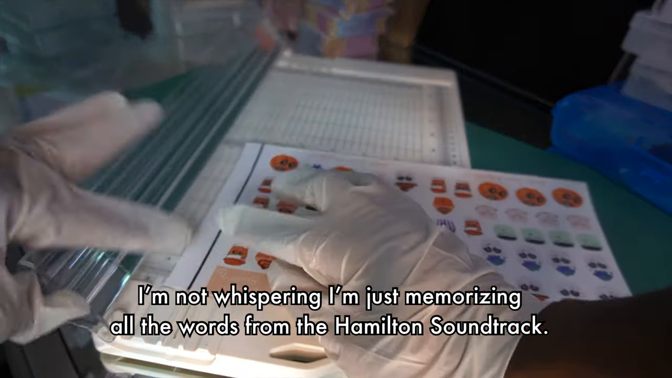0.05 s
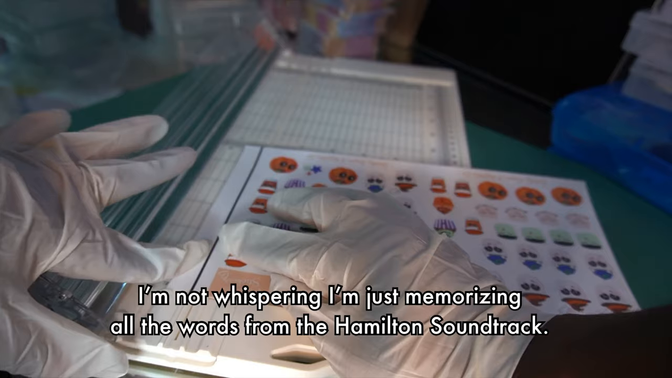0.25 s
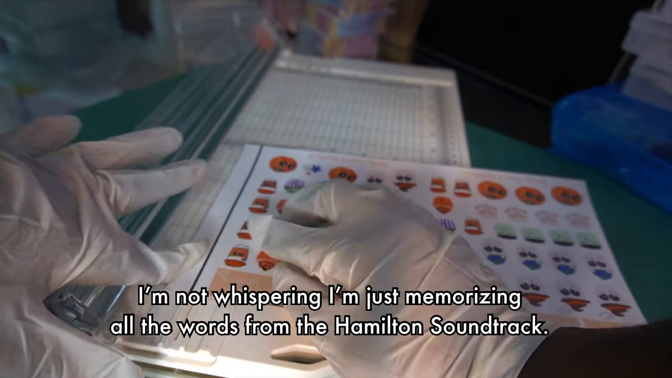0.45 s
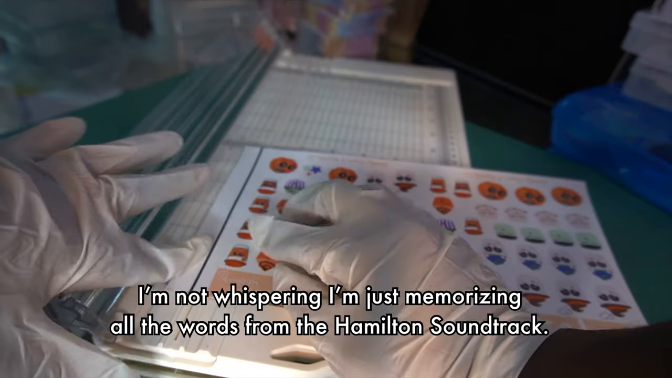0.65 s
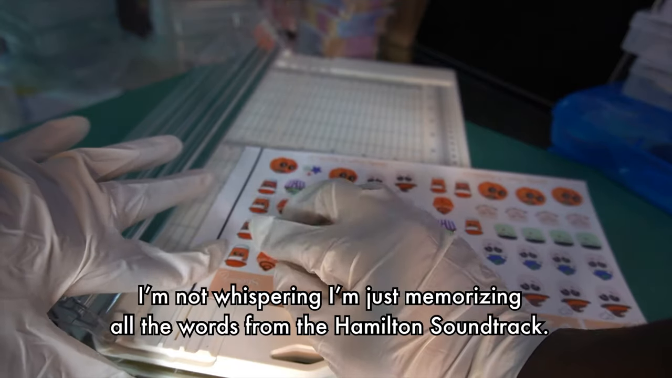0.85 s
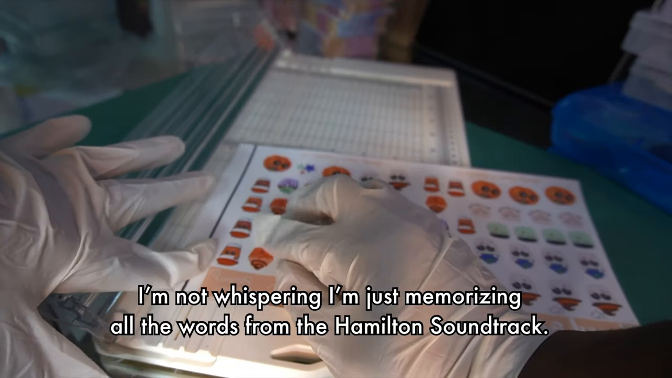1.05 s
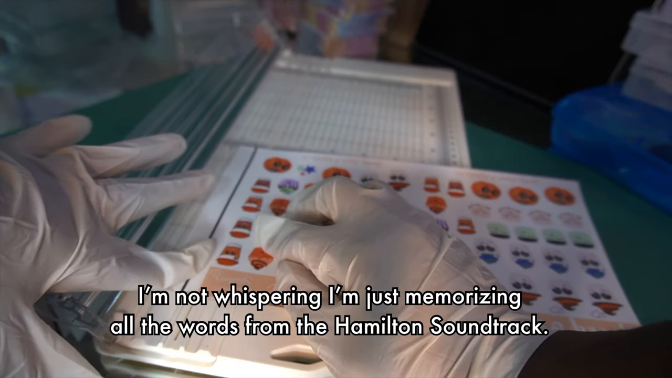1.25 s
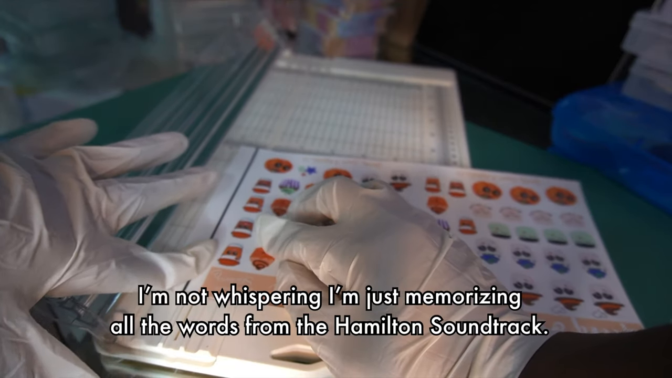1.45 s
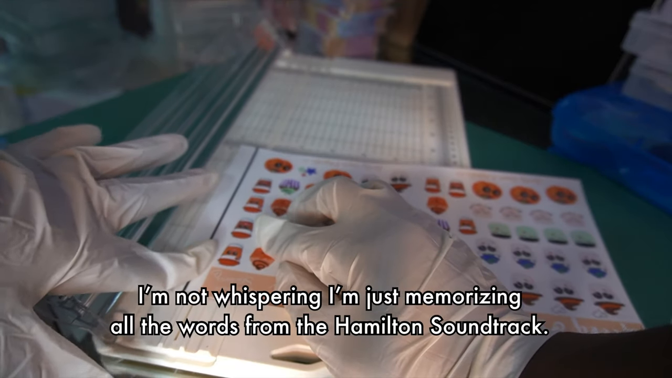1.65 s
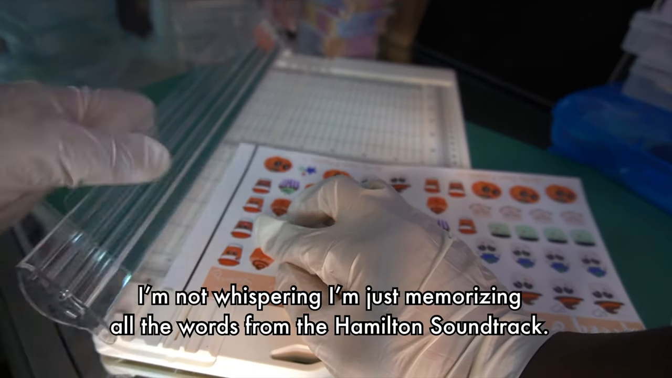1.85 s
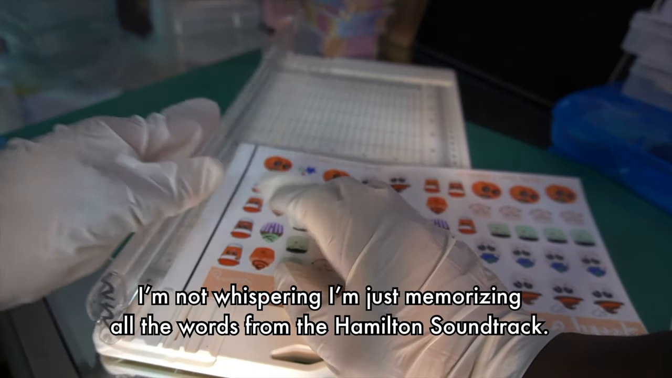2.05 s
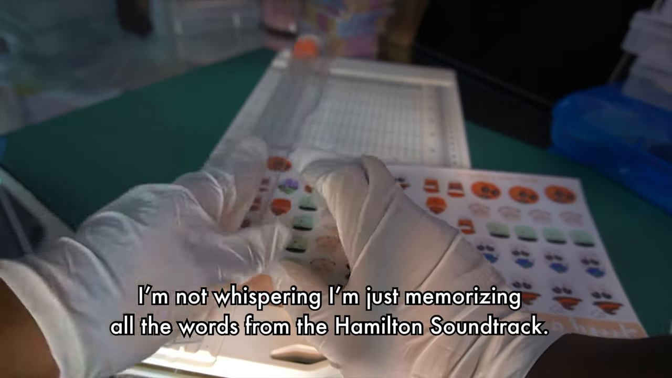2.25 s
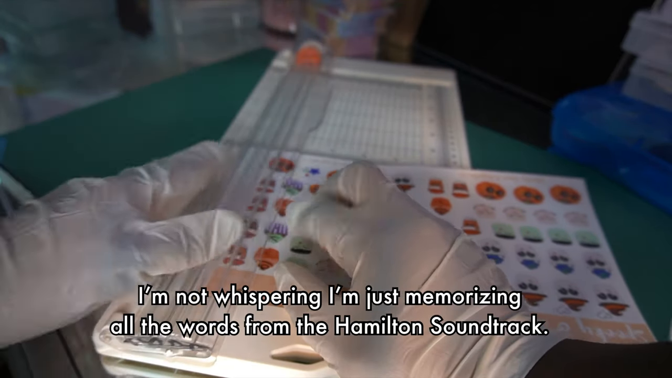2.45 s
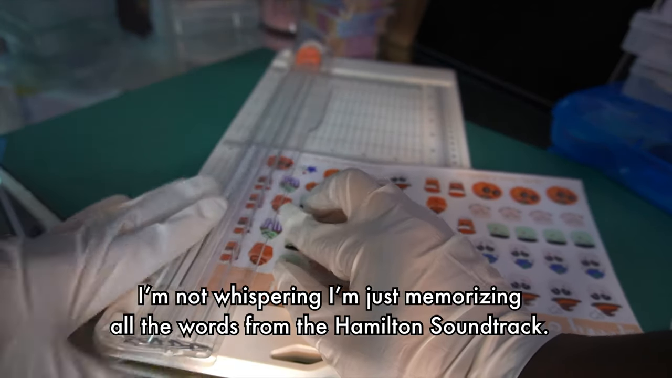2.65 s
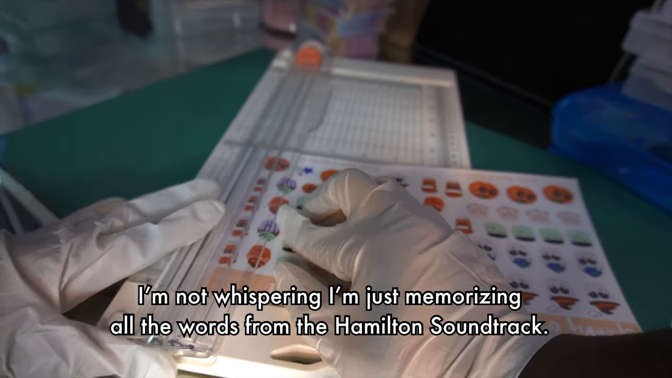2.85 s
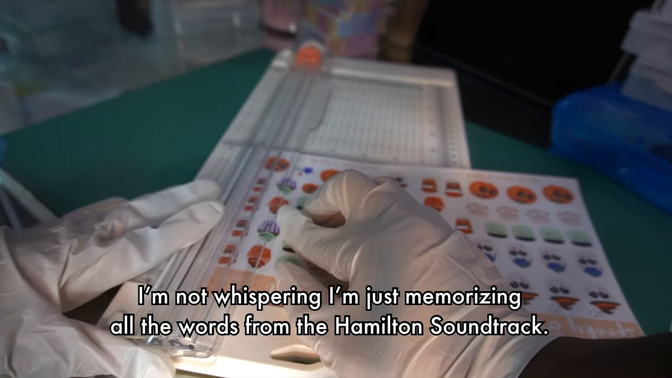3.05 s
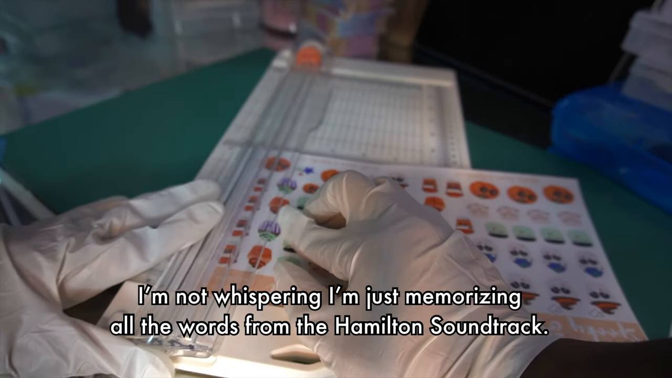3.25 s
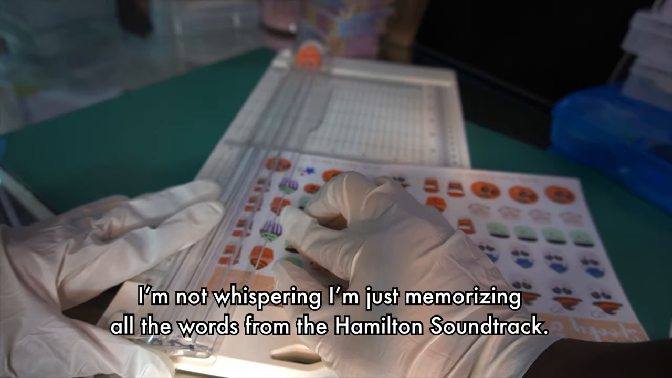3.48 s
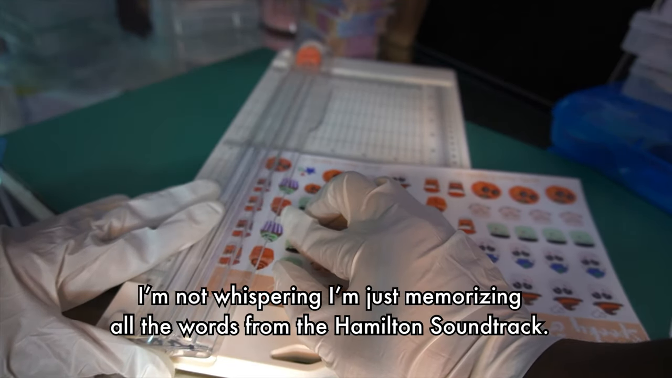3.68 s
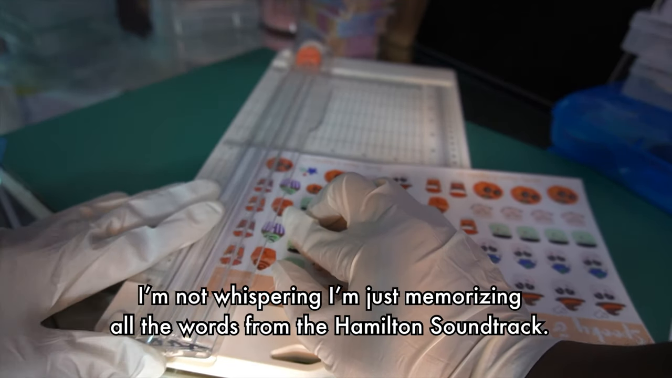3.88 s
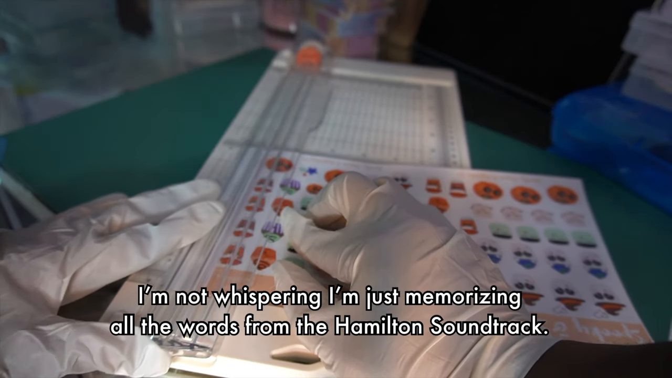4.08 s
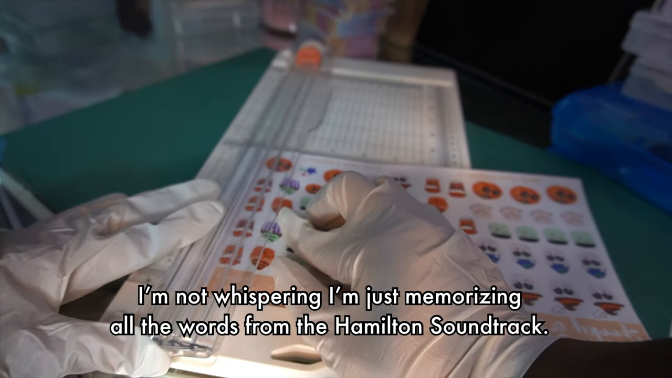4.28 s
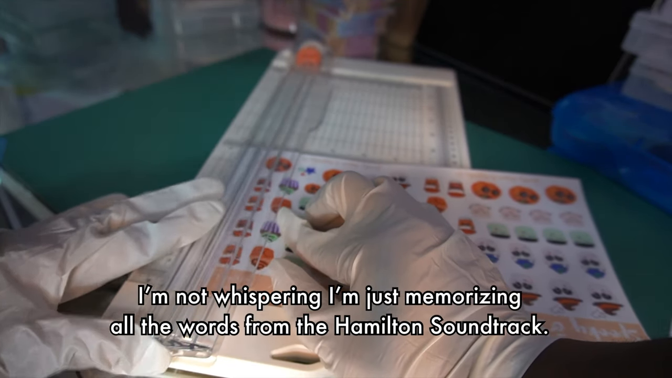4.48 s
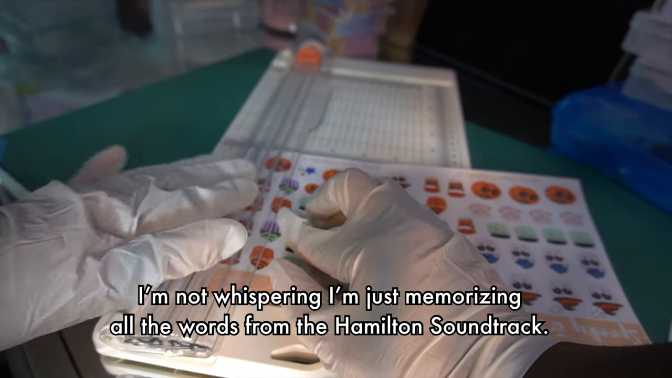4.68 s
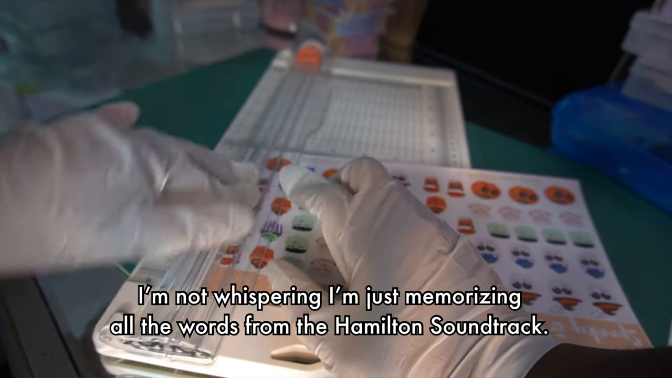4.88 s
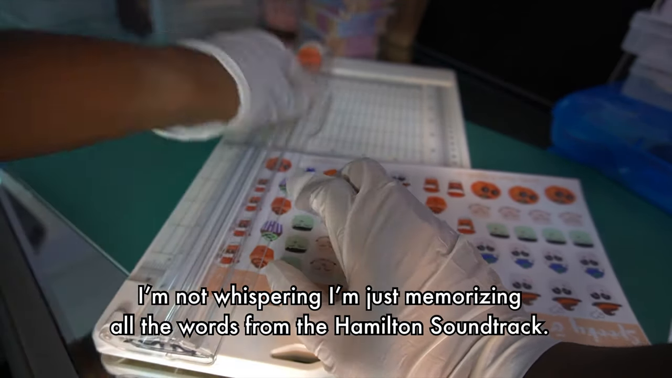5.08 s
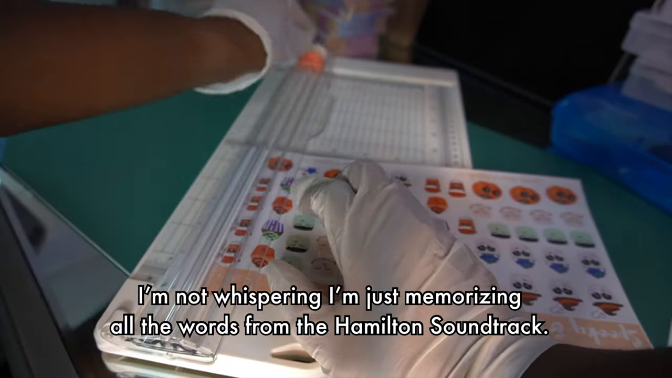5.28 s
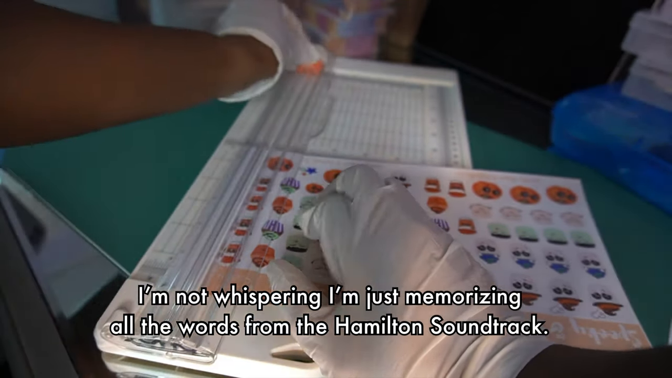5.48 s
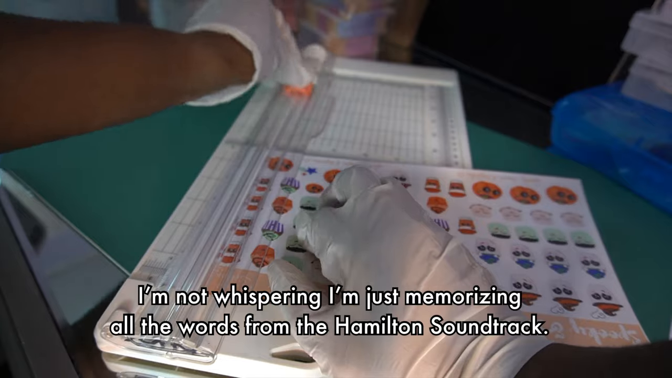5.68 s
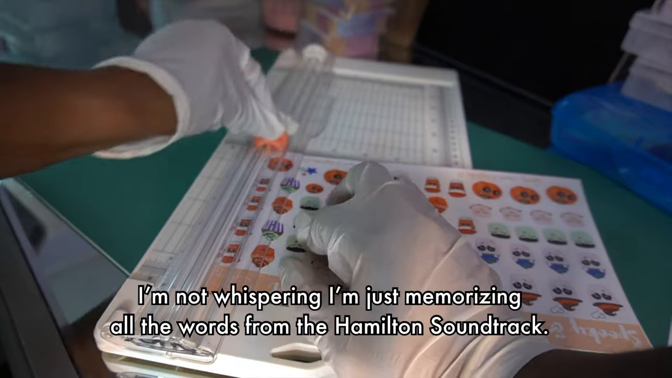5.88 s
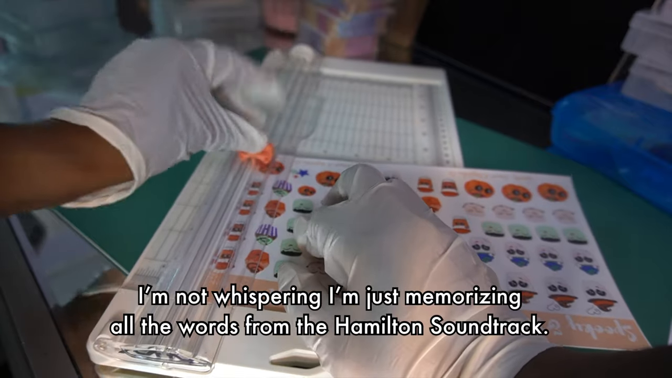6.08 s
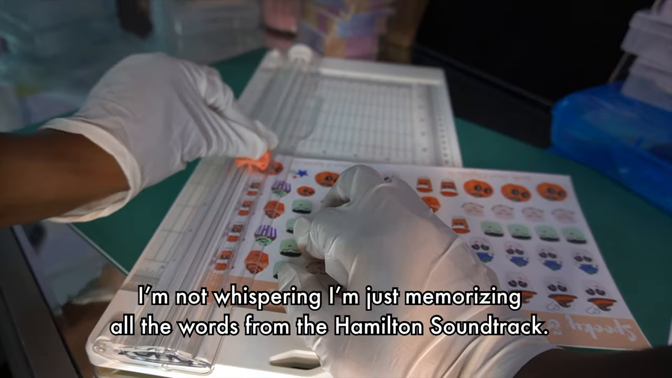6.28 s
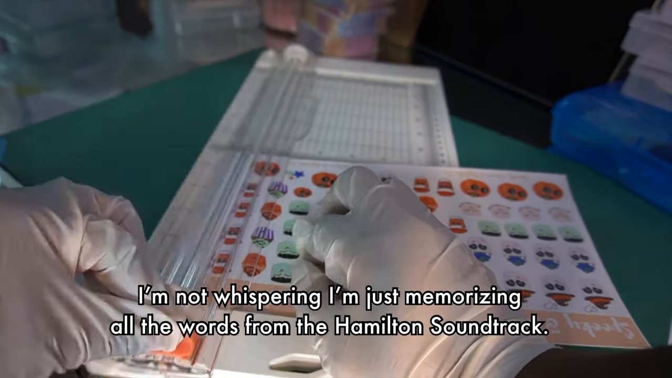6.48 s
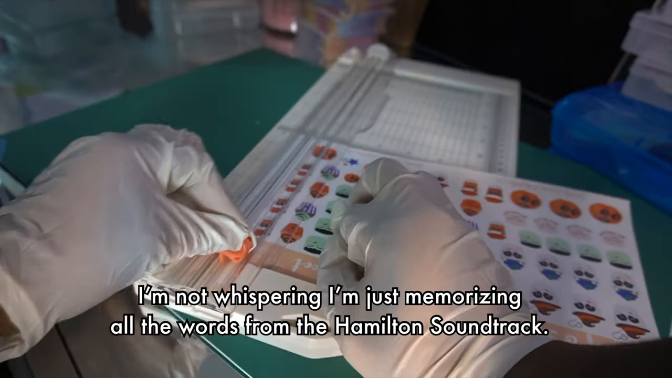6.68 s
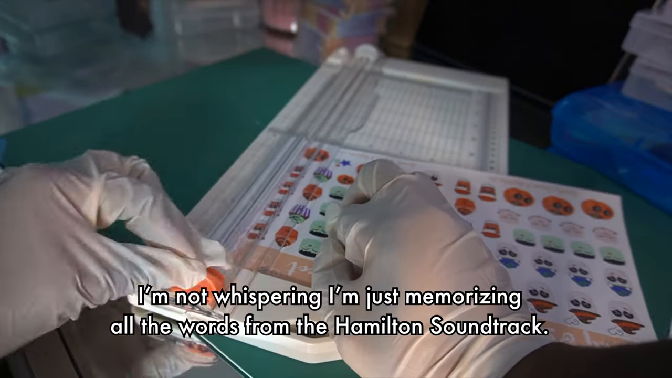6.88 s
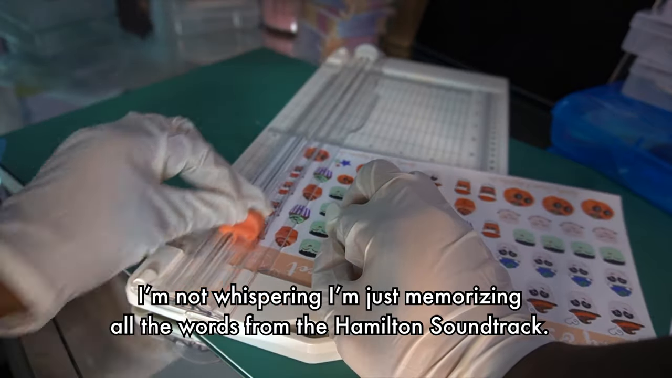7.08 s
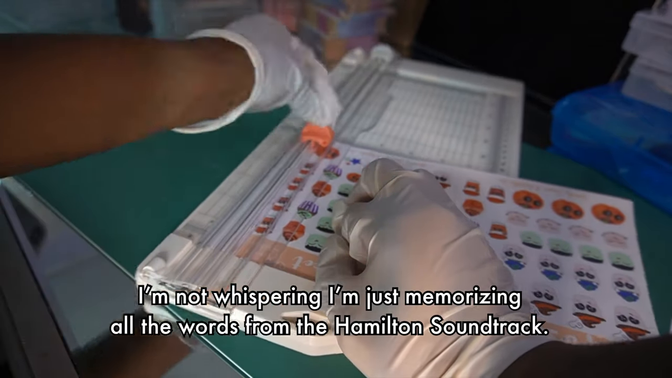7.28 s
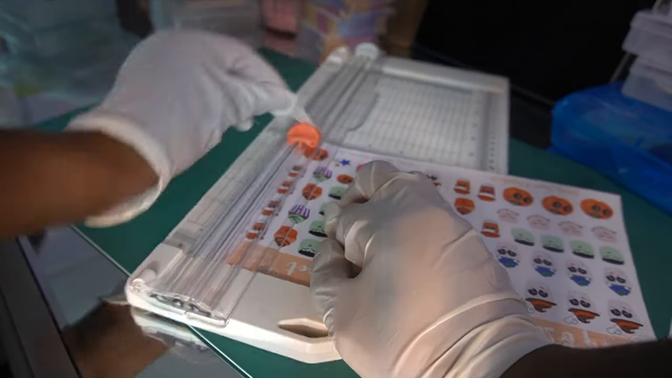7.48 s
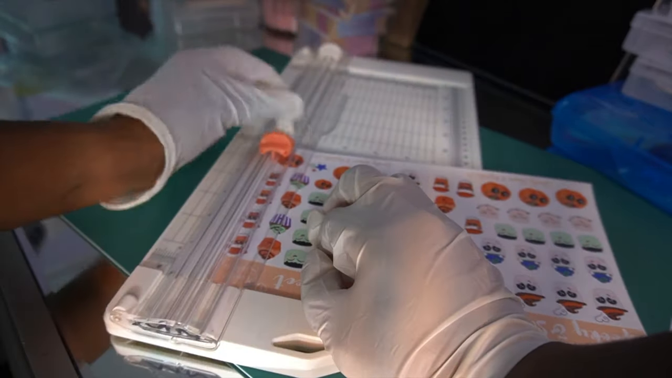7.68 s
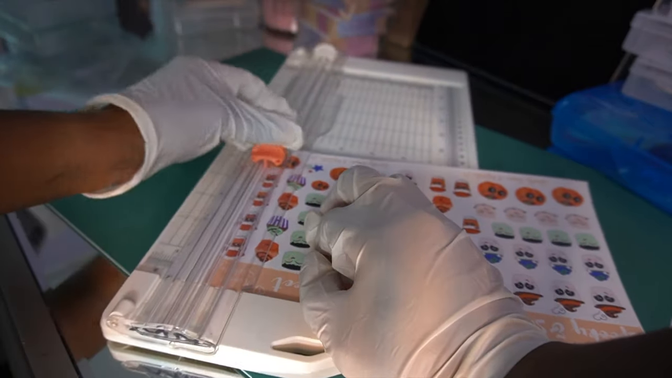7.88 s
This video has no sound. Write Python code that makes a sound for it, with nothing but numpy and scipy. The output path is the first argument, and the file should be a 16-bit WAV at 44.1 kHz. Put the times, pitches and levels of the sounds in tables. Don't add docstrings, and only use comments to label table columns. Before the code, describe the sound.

A quiet indoor room, heard closely in stereo, with faint air hiss and a low appliance drone that swells and fades. From 0 to 1.9 seconds there is a tiny opening tick, then only soft crinkles of thin gloves. Light taps begin around 1.9, and at 2.3-2.45 a plastic rail snaps down: rapid bright clicks, hollow board ring, desk thud. Near quiet until soft bumps at 4.7-5.0. Sharp carriage clicks and rattles come at 5.1, 5.37 and 5.5, followed by faint sliding and taps to 6.2. From 6.3 to 6.5 the blade cuts: rail scrape, paper hiss and a thin climbing whistle, ending in knocks. A loud hollow stop with a desk thump lands at 6.7, a crisp snap at 6.87, then a light return slide and clustered hard knocks at 7.2-7.35. A softer scrape at 7.5, small ticks and another slide close by 7.9.

```python
import sys
import numpy as np
from scipy import signal
from scipy.fft import rfft, irfft, next_fast_len
from scipy.io import wavfile
from scipy.ndimage import uniform_filter1d, map_coordinates

SR = 44100
rng = np.random.default_rng(int(sys.argv[2]) if len(sys.argv) > 2 else 0)


def attenuation_scalar(level_db):
    decades = np.asarray(level_db, float) / 20
    return 10 ** decades


def wav_record(signal):
    frames = np.transpose(np.atleast_2d(signal))
    bounded = np.clip(frames, -1, 1)
    quanta = np.round(bounded * 32767).astype(np.int16)
    wavfile.write(sys.argv[1], SR, quanta)


N = 349707

# t/s, knock peak level/dB, f/Hz, crack over knock level/dB
KNOCKS = [(1.941, -28.5, 900, -23), (2.239, -37, 2300, -6), (2.32, -8, 900, -29), (2.323, -13.5, 460, -30),
          (2.334, -10, 594, -4), (2.352, -7, 1710, -20), (2.383, -13, 1100, -15), (2.407, -28, 1700, -22),
          (2.396, -18, 1100, -4), (2.432, -24, 1690, -19), (2.495, -39, 1150, -15), (2.543, -40, 1150, -19),
          (2.639, -37, 1936, -14), (2.727, -38, 1140, -28), (4.789, -33.5, 880, -9), (4.818, -28, 970, -28),
          (4.973, -33, 1050, -11), (5.456, -22, 756, -23), (5.469, -25, 2800, -18),
          (5.488, -10.5, 950, -5.5), (5.677, -26.5, 1014, -12), (5.787, -32.5, 900, -20),
          (6.111, -37, 1600, 0), (6.147, -29.5, 2190, -1.5), (6.153, -28, 780, -19), (6.292, -38, 1840, 1),
          (6.583, -13.5, 810, -11), (6.658, -12.5, 483, -20), (6.681, -5, 1810, -11), (6.686, -3, 785, -10),
          (6.702, -10.5, 1760, -19), (6.74, -25, 900, -25), (7.075, -30, 870, -5),
          (7.147, -34.5, 1600, 4.5), (7.183, -26, 899, 0), (7.209, -19, 1670, -5), (7.266, -8.5, 500, -30),
          (7.272, -10.5, 890, -26), (7.752, -28, 1490, -9), (7.8, -33, 820, -23), (7.866, -33, 1680, -18)]
# t/s, knock peak level/dB, f/Hz, crack over knock level/dB
RAIL_TICKS = [(0.0, -30, 3440, 5.5), (2.299, -36, 2300, -8), (2.35, -14, 1300, 2.5),
              (2.762, -25, 1600, -16), (4.213, -41, 2480, -3.5), (5.1145, -9.5, 2750, 0),
              (5.1165, -8, 830, -7.5), (5.255, -26, 970, -25.5), (5.3637, -10.5, 2270, -12),
              (5.3645, -9, 900, -25), (5.481, -17, 1670, -6), (5.575, -18, 2340, -36),
              (5.5752, -19.5, 900, -35), (6.21, -25.5, 706, -6), (6.474, -7, 1660, -1),
              (6.496, -6, 1670, -1), (6.866, -15, 1770, 0.5), (6.969, -30.5, 1940, -9),
              (7.337, -12.5, 1600, -5), (7.354, -14, 1690, -14)]
# t/s, knock peak level/dB, f/Hz, crack over knock level/dB
DESK_THUMPS = [(1.911, -33.5, 710, -30), (2.064, -30, 3500, -9.5), (2.372, -21, 1800, 10),
               (4.676, -38, 1140, -12), (5.111, -19.5, 1040, 0), (5.372, -16, 1310, 3.5),
               (5.437, -22, 920, -11), (5.936, -17.5, 765, -3), (6.255, -32.5, 899, -3),
               (6.799, -31, 1590, -19), (6.841, -31, 1805, -3), (7.263, -5.5, 1570, -5),
               (7.322, -17, 796, -15), (7.692, -41, 904, 0)]
# t/s, peak level/dB, f/Hz, t60/s
DINGS = [(0.0, -32, 1740, 0.027), (0.0, -28.5, 3330, 0.027), (0.012, -46, 235, .2),
         (2.352, -18, 1714, 0.043), (2.381, -22.5, 3410, .04), (2.403, -36, 1790, .05),
         (2.405, -33, 3300, .04), (4.675, -40, 1106, 0.046), (4.682, -43, 397, 0.11),
         (4.789, -40, 876, .07), (4.79, -42.5, 379, .2), (4.818, -42, 1060, .05), (4.973, -48, 1080, 0.12),
         (4.972, -44.5, 174, 0.17), (5.255, -39, 1750, 0.044), (5.3637, -16, 1600, 0.02),
         (5.364, -16, 2800, 0.013), (5.3727, -18, 1820, 0.021), (5.366, -30, 399, 0.12),
         (5.437, -35, 1600, .04), (2.353, -20.5, 1088, 0.067), (5.5761, -25, 1620, .025),
         (5.575, -31, 3050, 0.013), (6.583, -26.5, 850, .05), (6.686, -19, 805, 0.06),
         (6.847, -32, 1830, 0.031), (7.003, -42, 1050, 0.046), (7.058, -52, 1710, .05)]
# t/s, peak level/dB, f/Hz
SNAPS = [(2.3634, -6.5, 4900), (2.3944, -17, 3510), (4.9911, -18, 5700), (5.1125, -11, 11500),
         (5.372, -6, 7000), (5.3706, -3.5, 13500), (5.9315, -11.5, 8400), (5.933, -20, 13500),
         (6.2083, -16, 6240), (6.5504, -20, 3450), (6.8385, -26, 5500), (6.8468, -19, 5700),
         (6.866, 0, 7000), (6.8665, -9, 10900), (7.2225, -10, 6200), (7.3205, -15, 11300),
         (7.3374, -5, 6540), (7.8665, -26, 5600)]
# t/s, peak level/dB, f/Hz
CLICKS = [(2.3345, -9, 9000), (2.3457, -3.5, 5400), (2.351, -5.5, 10000), (2.362, -13, 11000),
          (2.3665, -17, 11000), (2.372, -19, 6000), (2.383, -26, 9000), (2.395, -13, 10000),
          (2.407, -26, 11000), (2.431, -24, 11500), (5.1194, -9.5, 7250), (5.144, -17, 8000),
          (5.15, -18, 3500), (5.166, -29, 6000), (5.4542, -35, 9000), (5.47, -46, 7000),
          (5.481, -9.5, 6700), (5.4871, -18, 9800), (6.0604, -40, 11800), (6.0923, -28, 12000),
          (6.252, -33, 6270), (6.2758, -37, 6500), (6.2923, -17, 6820), (6.3142, -15, 7900),
          (6.366, -10, 6000), (6.427, -17, 5000), (6.436, -13, 8300), (6.598, -25, 6500), (6.658, -8, 3000),
          (6.6804, -15, 8900), (6.686, -30, 7000), (6.694, -24, 9000), (6.701, -28, 10000),
          (6.708, -35, 10000), (6.733, -24, 2970), (6.755, -35, 11000), (7.209, -30, 9000),
          (7.2157, -23, 5560), (7.22, -22, 10500), (7.239, -32, 6000), (7.332, -19, 3500),
          (7.344, -20, 5000), (7.338, -16, 13100), (7.354, -18, 7000), (7.483, -34, 11000)]
# t/s, peak level/dB, f/Hz
CREASES = [(0.1228, -36, 5500), (0.155, -41, 7500), (0.2284, -37.5, 4700), (0.3044, -44, 5700),
           (0.3797, -39, 5830), (0.525, -41, 4760), (0.57, -45, 5500), (0.7048, -36, 4750),
           (0.941, -38, 7450), (1.0181, -36, 6100), (1.7843, -42, 5860), (2.0338, -37, 5670),
           (1.865, -41, 6000), (2.075, -47, 6000), (2.21, -36, 5500), (2.8144, -35, 5900),
           (3.8591, -37.5, 6560), (3.89, -48, 6500), (4.508, -41, 5540), (4.5665, -37, 5000),
           (4.9541, -36.5, 6460), (5.72, -41, 4200), (5.8207, -33, 6600), (5.911, -32, 3700),
           (5.914, -34, 7070), (5.922, -35, 2900), (6.811, -36, 6500), (6.881, -24.5, 4200),
           (7.11, -32, 8000), (7.445, -35, 6500), (7.672, -33, 9370), (7.7305, -43, 3780),
           (7.8774, -36, 5940)]
# t/s, peak level/dB, f/Hz
BLADE = [
    (6.295, -27, 5100),
    (6.336, -18.5, 6360),
    (6.369, -18, 8340),
    (6.405, -15.5, 8600),
]
# t/s at full speed, rise/s, hold/s, scrape level/dB, hiss over scrape level/dB
SLIDES = [(5.615, 0.024, 0.27, -57.5, -0.5), (5.942, 0.034, .006, -44, 3), (6.137, 0.1, 0.13, -51, -4),
          (6.103, 0.039, .005, -60.5, 9.5), (6.321, 0.045, 0.081, -34, 4.5), (6.427, 0.091, 0.045, -35, 8),
          (6.581, 0.028, 0.0091, -31, -24), (6.635, 0.039, 0.024, -26.5, 2.5),
          (6.745, .012, 0.078, -50.5, -23), (6.89, 0.011, 0.14, -53.5, -10),
          (7.06, 0.013, 0.17, -48.5, -3.5), (7.262, 0.0092, .002, -54, 1), (7.265, 0.1, 0.011, -29.5, -9.5),
          (7.536, 0.088, 0.069, -36.5, -15), (7.687, 0.047, 0.14, -58.5, 1.5),
          (7.93, 0.075, .008, -38.5, -9.5)]
# t/s, hold/s, t60/s, scrape level/dB, hiss over scrape level/dB
SHIVERS = [(0.0, .004, 0.28, -48.5, 3), (1.944, 0.0079, 0.12, -45, -27), (2.236, 0.015, 0.29, -51, -8),
           (2.32, 0.051, 0.2, -23, -4.5), (4.672, 0.002, 0.053, -46, -7), (4.803, 0.013, 0.12, -53.5, 0.5),
           (5.115, 0.038, 0.31, -30.5, 0.5), (5.248, .003, 0.16, -42, -43),
           (5.373, .002, 0.16, -26.5, -7.5), (5.438, 0.04, .05, -43, -30), (5.492, .002, 0.18, -29, -5),
           (5.58, .003, 0.26, -47, -38), (5.935, 0.036, 0.14, -32.5, -6), (6.481, 0.0037, 0.04, -29, -26),
           (6.497, 0.0018, 0.2, -25.5, -12), (6.682, 0.0018, 0.16, -24.5, -12), (6.838, .002, 0.13, -42, 1),
           (6.873, 0.0026, 0.18, -45.5, 10.5), (7.258, 0.0044, 0.096, -20, -33),
           (7.327, 0.019, 0.16, -28, -9)]
# t/s, rise/s, hold/s, level/dB, f/Hz
GLIDE = [
    (5.795, .012, 0.066, -58, 905),
    (5.92, .05, .006, -55, 905),
    (6.115, 0.0073, 0.039, -55, 1650),
    (6.317, 0.035, 0.035, -34.5, 1900),
    (6.43, 0.069, 0.041, -29, 1960),
    (6.642, 0.053, 0.025, -24, 1750),
    (7.226, 0.021, 0.0087, -35.5, 1825),
]
# t/s at full speed, rise/s, hold/s, level/dB
DRAGS = [
    (4.89, .02, .02, -64),
    (5.06, 0.033, 0.025, -62.5),
    (6.597, 0.026, 0.091, -38),
    (7.538, 0.054, 0.078, -43.5),
    (7.906, 0.04, .02, -47.5),
]
# t/s, hold/s, t60/s, desk level/dB
PALMS = [(1.933, 0.013, 0.22, -54), (2.376, 0.036, 0.15, -47), (4.682, 0.0082, 0.28, -48),
         (4.786, 0.032, 0.27, -46.5), (4.962, 0.04, 0.12, -58), (5.124, 0.019, 0.13, -44),
         (5.575, 0.014, 0.11, -39), (5.957, 0.02, 0.17, -44), (6.233, 0.026, 0.083, -50),
         (6.322, 0.035, 0.073, -50), (6.696, 0.012, 0.08, -32.5), (6.821, 0.12, 0.32, -49.5),
         (7.205, 0.026, 0.15, -39), (7.268, 0.04, 0.11, -38), (7.34, 0.061, 0.16, -45),
         (7.485, 0.043, 0.24, -60), (7.685, 0.012, 0.44, -48)]
# t/s, rise/s, hold/s, level/dB
GLOVES = [(0.102, .03, 0.3, -64), (0.69, .03, .36, -67), (1.746, 0.064, 0.8, -62.5),
          (2.448, .012, 0.37, -62), (3.849, .035, .03, -59.5), (4.511, .03, 0.071, -58.5),
          (5.08, 0.46, 0.015, -56.5), (4.994, .006, 0.023, -64), (5.343, 0.041, .005, -52.5),
          (7.363, .02, 0.032, -50.5)]
# t/s, free/s, peak level/dB, lower note over upper level/dB
DRUMS = [(2.373, 0.057, -26, -3), (4.678, 0.029, -36.5, 12), (4.791, 0.051, -38.5, -2),
         (5.133, 0.07, -33, -4), (5.376, 0.046, -32, -5), (5.454, 0.041, -36, -4), (5.577, 0.03, -39, -7),
         (5.94, 0.055, -39, -3), (6.84, 0.095, -38, -10), (6.697, 0.072, -28.5, 3), (7.218, 0.02, -27, 9),
         (7.266, 0.049, -26, -8), (7.33, 0.023, -24, -16)]
# t/s, peak level/dB
HEAVES = [
    (2.392, -43),
    (4.675, -46.5),
    (5.112, -44),
    (5.931, -42),
    (6.685, -31),
    (7.225, -47),
    (7.265, -29),
    (7.329, -36),
    (7.7, -49),
]

# f/Hz, width/Hz, level/dB
BOARD = [(457, 35, -6.5), (680, 152, -1.5), (900, 33, 0.5), (1087, 43, 1.5), (1295, 29.5, -2),
         (1600, 93, 1.5), (1907, 250, -7.5), (2360, 290, -5.5), (2800, 470, -14.5), (3450, 310, -9),
         (5000, 1500, -23)]
# f/Hz, width/Hz, level/dB
FRAME = [(660, 1250, -11.5), (2140, 5900, -23.5)]
# f/Hz, width/Hz, level/dB
DESK = [(169, 30, -9), (193, 26, 3), (234, 21, 6.5), (375, 60, -6.5)]
# f/Hz, width/Hz, level/dB
UNDERSIDE = [(383, 25, 5), (586, 27, 1), (750, 38, 2), (903, 32, 2.5), (1060, 75, 0)]
# f/Hz, width/Hz, level/dB
GLOVE_FOLDS = [(5300, 5700, 23), (9500, 10000, -22)]
# f/Hz, level/dB per Hz
PAPER = [(1470, -30), (2500, 0), (3430, -0.5), (4820, -0.5), (5800, -0.5), (6310, -0.5), (8010, -2.5),
         (10700, -9), (11900, -6.5), (15800, -12)]

# f/Hz, likeness
NEAR_ALIKE = [(60, 1), (180, 1.0), (550, 1), (1650, 0.93), (4970, 0.4), (9000, 0.24), (15000, 0.38)]
# f/Hz, likeness
AIR_ALIKE = [(60, 0.94), (150, 0.99), (380, 0.55), (950, -0.089), (2380, -0.39), (5980, -0.16),
             (15000, 0.41)]
# f/Hz, t60/s
ROOM = [(200, 0.043), (2000, 0.54), (12000, 0.47)]
# f/Hz, level/dB per Hz
AIR = [(12, -71.5), (20, -26), (59, -13), (74, -11.5), (93, -2.5), (119, -9), (158, -2.5), (209, -7),
       (240, -9), (308, -11), (443, -10.5), (969, -14.5), (1110, -14.5), (1510, -18.5), (15800, -32)]
# t/s, level/dB
AIR_SWELL = [(.3, -1.5), (.7, 0), (1.4, -1), (2.8, 0.5), (3.5, -1.5)]
# f/Hz, width/Hz, level/dB
HUM = [(155, 13, 2), (236.4, 4.4, 8)]
# t/s, level/dB
DRONE = [(0, -3), (.5, -12), (1.15, 0), (1.4, -11), (2.3, -10), (2.6, 1.5), (2.95, -6), (3.2, 4),
         (3.45, -18), (3.9, -8), (4.6, -11.5), (7.93, 5.5)]

RISE_DB, PRESS_DB_PER_S, STOP_T60_S = 19, 2.5, 0.15
CRACK_T60_S, CREASE_T60_S, SNAP_T60_S, CLICK_T60_S = 0.021, 0.057, 0.012, 0.012
DRUM_HZ, DRUM_T60_S, DRUM_STOP_T60_S = (187.3, 233.1), 0.4, 0.046
HEAVE_HZ, HEAVE_T60_S = 89.4, 0.22
AIR_DB, MOTOR_HZ, MOTOR_DB = -61.5, 93, -61
TOP_HZ = 15850


def unit(x):
    return x / np.sqrt(np.mean(x ** 2) + 1e-20)


def along(points, hz):
    f, v = np.transpose(points)
    return np.interp(np.log(hz + 1), np.log(f + 1), v)


def wobble(rate_hz):
    knots = rng.standard_normal(int(N * rate_hz / SR) + 4)
    return map_coordinates(knots, [np.arange(N) * rate_hz / SR])


def filtered(x, response):
    n = x.shape[-1]
    m = next_fast_len(n + min(n, SR // 4))
    return irfft(rfft(x, m) * response(np.fft.rfftfreq(m, 1 / SR)), m)[..., :n]


def modes(table, flip=-1):
    def response(f):
        total = 0
        for k, (center, width, db) in enumerate(table):
            damping = 1j * f * width
            total = total + flip ** k * attenuation_scalar(db) * damping / (center * center - f * f + damping)
        return total
    return response


def add(track, s, piece, db):
    at = track[..., round(s * SR):][..., :piece.shape[-1]]
    at += attenuation_scalar(db) / np.abs(piece).max() * piece[..., :at.shape[-1]]


def knocks():
    out, t = np.zeros((2, N)), np.arange(SR // 16) / SR
    board, shell = modes(BOARD), modes([(1450, 5400, 0)])
    thud = filtered(np.outer([1, 0], np.arange(SR // 4) == 0), modes(DESK, 1))
    contact = np.hanning(SR // 5500)[None]
    # contacts, thud over knock/dB, share of ring the hand leaves undamped
    kinds = [(RAIL_TICKS, -17.5, 0.1), (KNOCKS, -15, 0.25), (DESK_THUMPS, -2, 0.12)]
    events = [(*row, thud_db, left) for rows, thud_db, left in kinds for row in rows]
    for s, db, hz, crack_db, thud_db, left in events:
        blow = 0.14 * rng.standard_normal((2, len(t))) * attenuation_scalar(-60 * t / 0.021) * [[1], [0.3]]
        blow[0, 0] += 1
        blow = signal.fftconvolve(blow, contact, axes=1)[:, :len(t)]
        near = modes([(hz, 0.14 * hz, 0)])
        ring = filtered(blow, lambda f: (near(f) + 0.21 * shell(f)) * (board(f) + 0.42 * shell(f)))
        damped = attenuation_scalar(-60 * t / 0.088) + left
        add(out, s, ring * damped * (1 - np.exp(-t / 0.00067)), db - 6)

        decay = attenuation_scalar(-60 * t / CRACK_T60_S) + 2.8 * attenuation_scalar(-60 * t / 0.0037)
        rattle = rng.standard_normal((2, len(t))) * decay * (1 - np.exp(-t / 0.0012)) * [[1], [0.4]]
        edge_hz = 30000 * attenuation_scalar(0.072 * db)
        crack = filtered(rattle, lambda f: attenuation_scalar(along(PAPER, f)) / (1 + (f / edge_hz) ** 2))
        add(out, s, crack, db + crack_db)
        add(out, s, thud, db + thud_db - 7.5)
    return out


def dings():
    out, t = np.zeros((2, N)), np.arange(SR // 8) / SR
    for s, db, hz, t60 in DINGS:
        sway = 0.66 * uniform_filter1d(rng.standard_normal(len(t)), size=40)
        tone = np.sin(2 * np.pi * hz * t + 3 * sway)
        add(out[0], s, tone * attenuation_scalar(-60 * t / t60) * (1 - np.exp(-t / 0.0001)), db)
    return out


def snaps():
    out, t = np.zeros((2, N)), np.arange(SR // 20) / SR
    kinds = [(CREASES, CREASE_T60_S), (SNAPS, SNAP_T60_S), (CLICKS, CLICK_T60_S)]
    for s, db, hz, t60 in [(*row, t60) for rows, t60 in kinds for row in rows]:
        envelope = attenuation_scalar(-60 * t / t60) * (1 - np.exp(-t / 0.0004))
        puff = rng.standard_normal((2, len(t))) * [[1], [0.45]] * envelope
        pitch = modes([(hz, 0.34 * hz, 0)])
        add(out, s, filtered(puff, lambda f: pitch(f) * (pitch(f) + 0.83)), db - 7)
    return out


def blade():
    out, swell = np.zeros((2, N)), np.hanning(SR // 14)
    for s, db, hz in BLADE:
        edge = modes([(hz, 0.39 * hz, 0)])
        noise = swell * rng.standard_normal((2, len(swell)))
        add(out, s, filtered(noise, lambda f: edge(f) ** 2), db)
    return out


def push(s, rise, hold, db, press, t60):
    top = db + press * hold
    return np.cumsum([s - rise, rise, hold, t60]), np.array([db - RISE_DB, db, top, top - 60])


def pushed(spans):
    t = np.arange(0, N, 16) / SR
    drive = sum(attenuation_scalar(np.interp(t, s, db, -200, -200)) for s, db in spans)
    return np.interp(np.arange(N) / SR, t, drive)


def grit(rate_hz, depth_db, patchy_db):
    grains = attenuation_scalar(depth_db * wobble(rate_hz)) * rng.standard_normal((2, N))
    z = signal.stft(grains, nperseg=256)[2]
    field = uniform_filter1d(rng.standard_normal(z.shape[1:]), size=2, axis=0)
    field = uniform_filter1d(field, size=5, axis=1)
    return unit(signal.istft(z * attenuation_scalar(patchy_db * unit(field)), nperseg=256)[1][:, :N])


def rubbing(spans, response, grains):
    gain = np.std(filtered(rng.standard_normal(SR), response))
    return filtered(pushed(spans) * grains, response) / gain


def scrape(spans):
    board, frame = modes(BOARD), modes(FRAME, 1)
    levels = [(s, db - 3) for s, db, _ in spans]
    return rubbing(levels, lambda hz: board(hz) + frame(hz), grit(300, 1.35, 2.8))


def paper_hiss(spans):
    grains = attenuation_scalar(0.7 * wobble(70)) * grit(600, 1.85, 2.9)
    levels = [(s, db + hiss_db) for s, db, hiss_db in spans]
    return rubbing(levels, lambda hz: attenuation_scalar(along(PAPER, hz)), grains)


def desk_rumble(spans):
    friction = [(s, 0.78 * db - 19) for s, db, _ in spans]
    weight = [push(s, 0.0053, hold, db, -40, t60) for s, hold, t60, db in PALMS]
    return rubbing(friction + weight, modes(DESK, 1), rng.standard_normal((2, N)) * [[1], [0.3]])


def drag():
    spans = [push(*row, 1.5, 0.12) for row in DRAGS]
    return rubbing(spans, modes(UNDERSIDE), rng.standard_normal((2, N)) * [[1], [0.35]])


def glide():
    t, note = np.arange(N) / SR, np.zeros((2, N))
    hz = np.interp(t, [row[0] for row in GLIDE], [row[-1] for row in GLIDE])
    phase = 2 * np.pi * np.cumsum(hz) / SR
    fuzzy = unit(wobble(650) * np.sin(phase) + wobble(650) * np.cos(phase))
    note[0] = pushed([push(*row[:-1], -50, 0.076) for row in GLIDE]) * fuzzy
    return note


def glove_rustle():
    spans = [push(*row, 1, 0.43) for row in GLOVES]
    return rubbing(spans, modes(GLOVE_FOLDS), attenuation_scalar(1) * grit(90, 1.04, 3.3))


def strokes():
    spans = [(*push(s, 0.0044, hold, db, -9, t60), hiss_db) for s, hold, t60, db, hiss_db in SHIVERS]
    for s, rise, hold, db, hiss_db in SLIDES:
        spans.append((*push(s, rise, hold, db, PRESS_DB_PER_S, STOP_T60_S), hiss_db))
    return scrape(spans) + paper_hiss(spans) + desk_rumble(spans) + drag() + glide() + glove_rustle()


def drum():
    out, t = np.zeros((2, N)), np.arange(SR // 4) / SR
    low, high = np.sin(2 * np.pi * np.outer(DRUM_HZ, t))
    for s, free, db, low_db in DRUMS:
        fade_db = -60 * (t / DRUM_T60_S + np.maximum(t - free, 0) / DRUM_STOP_T60_S)
        add(out[0], s, (high - attenuation_scalar(low_db) * low) * attenuation_scalar(fade_db) * (1 - np.exp(-t / 0.0043)), db)
    return out


def heave():
    out, t = np.zeros((2, N)), np.arange(SR // 4) / SR
    sway = np.sin(2 * np.pi * HEAVE_HZ * t) + 0.64 * np.sin(2 * np.pi * 1.7 * HEAVE_HZ * t)
    for s, db in HEAVES:
        add(out[0], s, sway * attenuation_scalar(-60 * t / HEAVE_T60_S) * (1 - np.exp(-t / 0.01)), db - 1.5)
    return out


def stereo(pair, alike):
    def mid_side(hz):
        turn = np.arccos(np.clip(along(alike, hz), -1, 1)) / 2
        return np.array([np.cos(turn), np.sin(turn)])
    mid, side = filtered(pair, mid_side)
    return np.array([mid + side, mid - side])


def placed(x):
    lean = [(300, 0), (700, -0.073), (1800, -0.58), (5000, -0.55), (10000, 1.0)]  # f/Hz, left level/dB

    def ports(hz):
        lean_db = along(lean, hz)
        return attenuation_scalar([lean_db, -lean_db]) * 1j * hz / (70 + 1j * hz)
    return filtered(x, ports)


def room(x):
    hz, t, z = signal.stft(rng.standard_normal((2, SR // 2)), SR, nperseg=256)
    bass_cut = (hz / (hz + 900))[:, None]
    decay = attenuation_scalar(-60 * t / along(ROOM, hz)[:, None])
    tail = signal.istft(z * bass_cut * decay, SR, nperseg=256)[1]
    delayed = np.pad(x, (300, 0))[None]
    return signal.fftconvolve(delayed, tail / np.linalg.norm(tail[0]), axes=1)[:, :N]


def air():
    t = np.arange(N) / SR
    hiss = unit(filtered(rng.standard_normal((2, N)), lambda hz: attenuation_scalar(along(AIR, hz))))
    drone_db = np.interp(t, *np.transpose(DRONE)) + 2.8 * wobble(4.7)
    hum = modes(HUM)
    drone = unit(filtered(attenuation_scalar(drone_db) * rng.standard_normal((2, N)), lambda hz: hum(hz) ** 2))
    phase = 2 * np.pi * MOTOR_HZ * t + 1.84 * wobble(10)
    motor = attenuation_scalar(MOTOR_DB + wobble(8.2)) * np.sin(phase)
    level = attenuation_scalar(AIR_DB + np.interp(t, *np.transpose(AIR_SWELL)))
    return level * stereo(attenuation_scalar(7) * hiss + attenuation_scalar(-2) * drone, AIR_ALIKE) + motor


def scene():
    sources = knocks() + dings() + snaps() + blade() + strokes() + drum() + heave()
    near = placed(stereo(sources, NEAR_ALIKE))
    return near + attenuation_scalar(-23.5) * room(near.mean(axis=0)) + air()


def roll_off(x):
    return signal.sosfilt(signal.butter(12, 17010, fs=SR, output="sos"), x)


def record(dry):
    held = dry / (1 + np.abs(dry / 0.75) ** 3) ** (1 / 3)
    mix = filtered(held, lambda hz: np.where(hz < TOP_HZ, 1, attenuation_scalar(-33)))
    return roll_off(mix)


dry = scene()
out = record(dry)
wav_record(out)
```